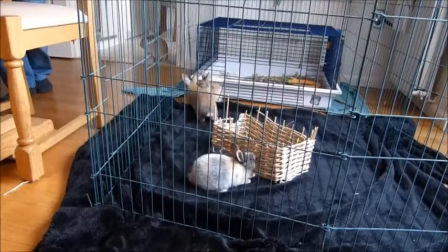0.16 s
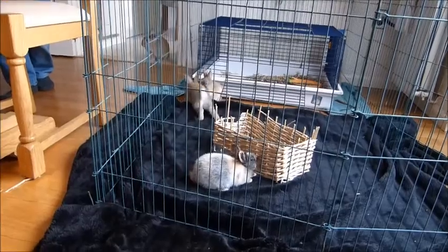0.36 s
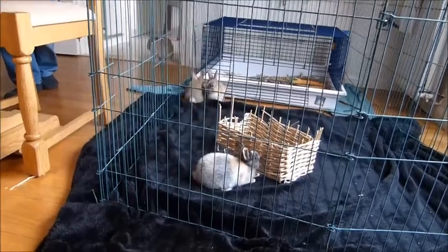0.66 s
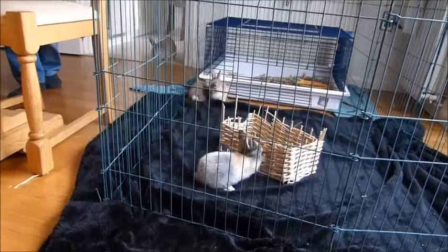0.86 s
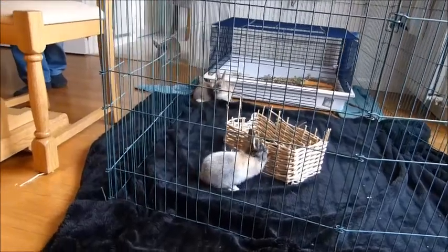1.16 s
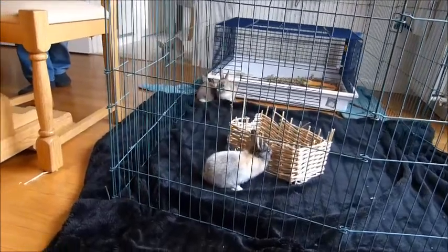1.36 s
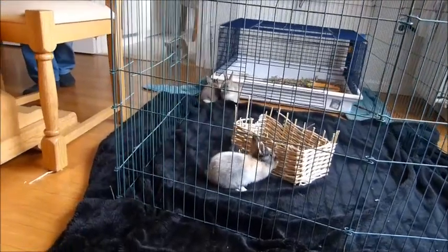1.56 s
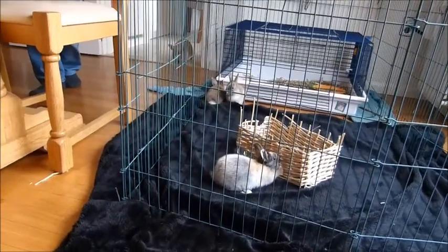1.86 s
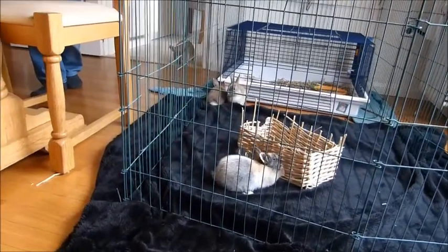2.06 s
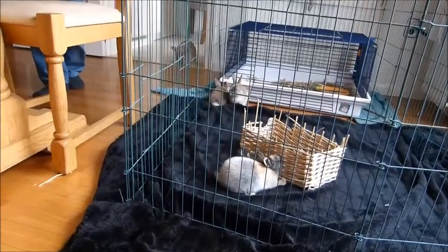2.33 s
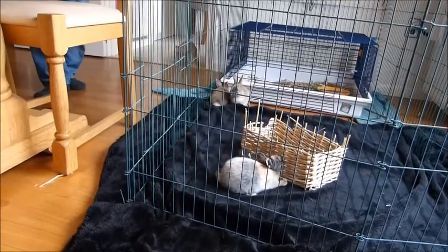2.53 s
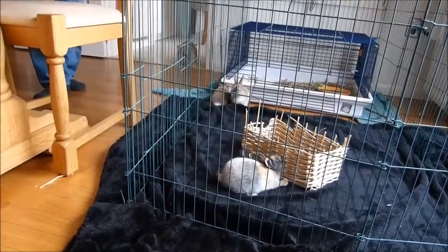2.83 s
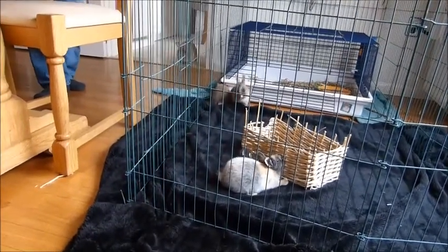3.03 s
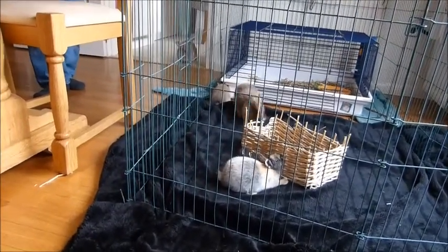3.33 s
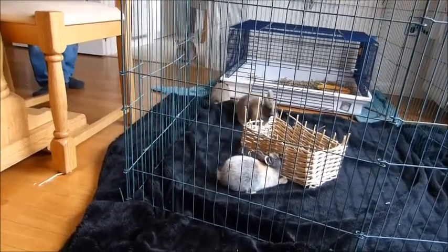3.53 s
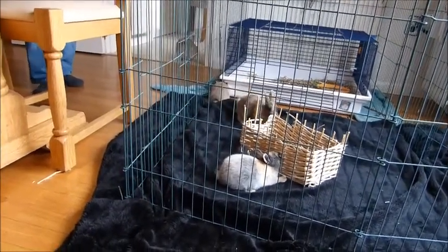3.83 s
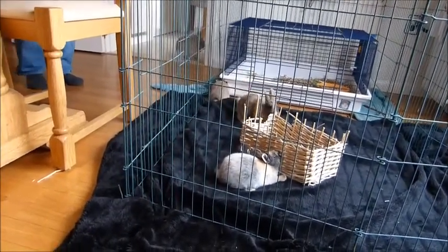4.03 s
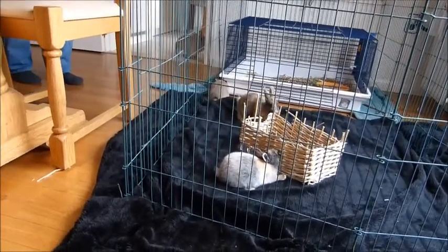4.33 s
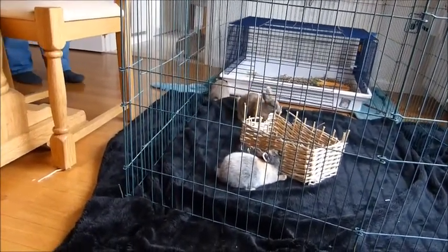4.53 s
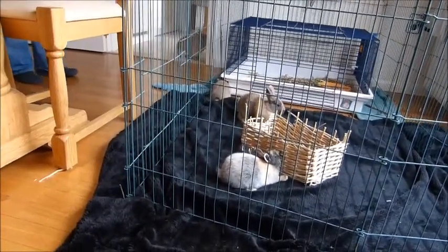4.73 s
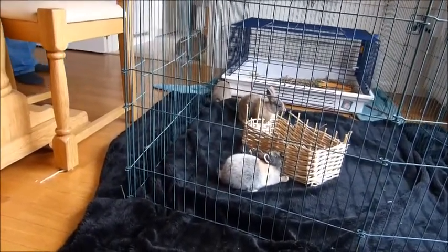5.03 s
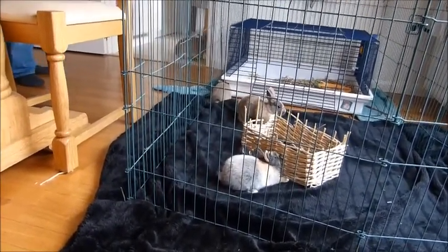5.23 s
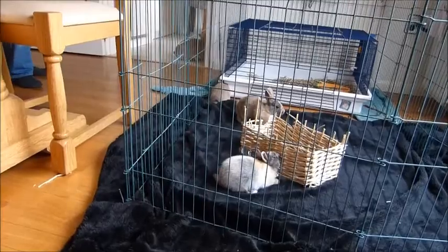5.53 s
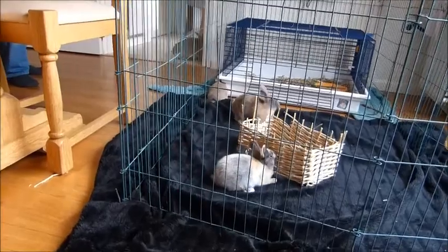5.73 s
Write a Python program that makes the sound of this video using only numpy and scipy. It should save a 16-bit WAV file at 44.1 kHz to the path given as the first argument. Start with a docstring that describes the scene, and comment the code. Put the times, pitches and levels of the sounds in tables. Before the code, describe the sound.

Young rabbits nibble at a wicker basket in a slightly echoing room. Light clicks and short crackling rustles come in small clusters, then thin out. A soft, low thud lands about halfway through. Sharper snaps of dry cane follow, mixed with hollow wooden knocks and a brief clatter from further off. The basket sounds fairly near the microphone, over a faint hum and hiss.

```python
"""Rabbits at a wicker basket

Young rabbits nibble and tug at a basket in a live room with a wooden floor. Dry canes snap by
brittle fracture and rub by stick-slip friction in short crackling rustles. Something lands with a
soft thud, and hollow wooden knocks and a clatter come from further off, over a faint hum and hiss."""
import sys
import numpy as np
from scipy import signal
from scipy.fft import rfft, irfft
from scipy.io import wavfile
from scipy.ndimage import uniform_filter1d

SR = 44100
rng = np.random.default_rng(int(sys.argv[2]) if len(sys.argv) > 2 else 0)


def file_out(sig):
    """Save sig as 16-bit WAV at sys.argv[1]."""
    # one column per channel
    cols = np.atleast_2d(sig).T
    # limit, then scale
    lim = np.clip(cols, -1, 1)
    pcm = np.round(lim * 32767).astype(np.int16)
    wavfile.write(sys.argv[1], SR, pcm)


N = 259308
HZ = np.fft.rfftfreq(4096, 1 / SR)  # frequency grid of the filter curves


# Each row: start in seconds, snap level in dB, resonance of the cane in Hz, drop to the second
# crack in dB, rub level in dB. Event levels in all tables are relative.
BITES = [(0.3977, -39.5, 6940, 12, -64), (0.482, -23, 9000, 8, -60), (0.966, -33, 4500, 12, -66),
         (0.9854, -31, 7650, 14, -58), (1.0317, -29, 8500, -1, -52.5), (1.127, -29.5, 7350, 10, -53.5),
         (1.1808, -27.5, 7000, 4, -53.5), (1.339, -25.5, 6130, 7, -53), (1.3772, -23, 4560, 10, -55),
         (1.4688, -22.5, 7560, -2, -66), (1.5201, -21.5, 7540, 9, -48), (1.6553, -26.5, 5830, 3.5, -59),
         (1.7054, -30.5, 3550, 10, -56), (1.7532, -28, 3780, 16, -60.5), (2.0788, -39, 7350, 14, -60),
         (2.2515, -40, 5500, 8, -55), (2.287, -28.5, 9100, 12, -52.5), (2.7645, -35, 5130, 11, -54),
         (3.3772, -34, 5250, 18, -76), (3.479, -37, 7700, 14, -77), (3.8642, -30, 5330, 12, -52),
         (3.8913, -15.5, 6340, 27, -58), (4.0308, -19.5, 3630, 9, -48.5), (4.146, -28, 6150, 18, -67),
         (4.2093, -31, 4180, 15, -56.5), (4.4999, -19, 5940, 16, -44), (4.5776, -20.5, 7650, 11, -35.5),
         (4.6864, -27.5, 4140, 14, -50), (4.9324, -23.5, 7300, 20, -68), (4.9721, -12.5, 8200, 15, -49),
         (5.0145, -21, 7700, 12, -46.5), (5.2414, -18.5, 3000, 0, -35), (5.467, -35, 5400, -2, -48.5),
         (5.7472, -27.5, 6540, 17, -53.5)]
# A snapping cane. Each row: frequency in Hz, spectral level in dB.
SNAP_SPECTRUM = [(150, -20.5), (400, -18), (800, -15.5), (1200, -14), (2200, -7), (3200, -7), (4100, 0.5),
                 (5200, 2), (8000, -0.5), (10000, -1), (12500, -12.5), (15500, -34)]
def snaps(level_db=-8, snap_ms=1.72, second_crack_s=0.0093, width_octaves=0.25, hard_bite_db=-19):
    """Brittle fracture: a cane gives way in two bursts, each coloured by its broad resonance."""
    out = np.zeros(N)
    for start, first_db, hz, drop_db, _ in BITES:
        resonance = 1 / (1 + (np.log2((HZ + 1) / hz) / width_octaves) ** 2)
        for delay, db, peak_db in [(0, first_db, 7), (second_crack_s, first_db - drop_db, 2)]:
            stretch = 1 + np.clip(0.09 * (hard_bite_db - db), 0, 1)  # gentle bites crush more slowly
            crunch = burst(snap_ms * stretch, rise=0.32) / stretch ** 0.44
            curve_db = curve_at(SNAP_SPECTRUM, HZ) + peak_db * resonance
            add(out, start + delay, amp(db + level_db) * colour(crunch, curve_db))
    return out


def pings(level_db=-19, db_per_octave=-3.5, middle_hz=5000, middle_t60_s=0.021):
    """Damped free vibration: a snapped cane rings on; thicker, lower canes ring louder and longer."""
    out, t = np.zeros(N), np.arange(SR // 4) / SR
    for start, db, hz, *_ in BITES:
        pitch_ratio = hz / middle_hz
        onset_db = db + level_db + db_per_octave * np.log2(pitch_ratio)
        decay_db = 60 * t * pitch_ratio / middle_t60_s
        add(out, start, amp(onset_db - decay_db) * np.sin(2 * np.pi * hz * t))
    return out


# Rubbing cane. Each row: frequency in Hz, spectral level in dB.
RUB_SPECTRUM = [(150, -36), (400, -22.5), (800, -11.5), (1300, -13), (2200, -9.5), (3300, -8), (4100, -1.5),
                (6000, 0), (8500, 1), (10500, -8.5), (13000, -15.5), (15500, -32)]
# Fur and paws on the weave. Each row: start and length in seconds, level in dB, low-band gain in dB.
BRUSHES = [(0.365, 0.061, -65.5, -7), (2.232, 0.088, -53, 0), (2.518, .11, -54, 7), (2.971, .1, -55, -26),
           (3.229, .143, -62.5, -4), (3.839, 0.058, -53.5, 4), (4.624, 0.3, -56.5, -2)]
# Steady gnawing at the rim. Each row: time in seconds, level in dB.
GNAWING = [(0.955, -69), (1.11, -54.5), (1.17, -51.5), (1.29, -45.5), (1.32, -69), (1.38, -48.5),
           (1.54, -53), (1.62, -68), (1.69, -54), (1.79, -63)]
# The duller rustle of shuffling about. Each row: time in seconds, level in dB.
SHUFFLING = [(2.5, -63.5), (2.88, -62.5), (2.99, -53), (3.08, -68), (3.65, -66), (4.2, -57.5), (4.45, -59),
             (4.55, -45.5), (4.64, -68.5), (5.22, -57.5), (5.5, -67), (5.88, -63.5)]
def rustles(level_db=-2.5, cracks_per_s=1100, clump_db=3, low_band_hz=3000, lead_s=0.005, rub_s=0.041):
    """Stick-slip friction: canes catch and slide on each other in clumps of micro-cracks."""
    out, t = np.zeros(N), np.arange(N) / SR
    clumps = unit_rms(uniform_filter1d(rng.standard_normal(N), size=200))
    slips = rng.random(N) < cracks_per_s / SR
    cracks = slips * rng.choice([-1, 1], N) * amp(clump_db * clumps)
    rub_db = curve_at(RUB_SPECTRUM, HZ)
    low_band = 1 / (1 + (HZ / low_band_hz) ** 4)
    # A bitten cane slides in the weave from just before it snaps.
    bite_rubs = [(start - lead_s, rub_s, db, -2) for start, *_, db in BITES]
    for start, length, db, low_db in bite_rubs + BRUSHES:
        window = signal.windows.tukey(round(length * SR), 0.6)
        stroke = unit_rms(np.roll(cracks, rng.integers(N))[:len(window)] * window)
        add(out, start, amp(db + level_db) * colour(stroke, rub_db + low_db * low_band))
    for contour, low_db in [(GNAWING, -4.5), (SHUFFLING, 13)]:
        effort = amp(level_db + np.interp(t, *np.transpose(contour), left=-np.inf, right=-np.inf))
        add(out, 0, colour(unit_rms(cracks) * effort, rub_db + low_db * low_band))
    return out


# Modes of the basket. Each row: frequency in Hz, level in dB, time to decay by 60 dB in seconds.
BASKET_MODES = [(776, -2.5, 0.046), (632, -12, 0.02), (1060, -12, 0.011)]
# Harder pulls and nudges. Each row: start in seconds, level in dB.
NUDGES = [(0.4823, -50), (0.86, -52.5), (3.8914, -48.5), (4.9722, -43), (5.0144, -50), (5.722, -48.5)]
def tugs(bite_coupling_db=-33):
    """Modal response: a pull on one cane shakes the whole basket into a short hollow note."""
    out, t = np.zeros(N), np.arange(SR // 4) / SR
    note = sum(amp(db - 60 * t / t60) * np.sin(2 * np.pi * hz * t) for hz, db, t60 in BASKET_MODES)
    for start, db, *_ in BITES:
        add(out, start, amp(db + bite_coupling_db) * note)
    for start, db in NUDGES:
        add(out, start, amp(db) * note)
    return out


# Wooden knocks. Each row: start in seconds, level in dB, treble tilt in dB per octave.
KNOCKS = [(4.029, -34, -2), (4.396, -39, -3.5), (4.458, -37.5, -2.5), (4.499, -42.5, 0), (4.528, -37, 4),
          (4.571, -26.5, 2), (4.582, -27, -0.5), (5.242, -38, 8.5), (5.357, -53.5, -12)]
# Struck hollow wood. Each row: frequency in Hz, spectral level in dB.
WOOD_SPECTRUM = [(50, -62), (110, -36), (180, -6.5), (300, -8.5), (400, -3), (620, 1.5), (900, 1.5),
                 (1400, -1), (1850, -6), (3000, -10), (5000, -11), (8500, -16.5), (11000, -48),
                 (14000, -45)]
def knocks(contact_ms=6, pivot_hz=1000):
    """Impact excitation: hollow wood is struck with a short rattling contact and bounces once."""
    out = np.zeros(N)
    octaves = np.log2(np.clip(HZ / pivot_hz, 1, 4))
    for start, db, tilt in KNOCKS:
        for delay, bounce_db, bounce_tilt in rebounds(gap_s=0.013, loss_db=5, dulling=3, count=2):
            curve_db = curve_at(WOOD_SPECTRUM, HZ) + (tilt + bounce_tilt) * octaves
            add(out, start + delay, amp(db + bounce_db) * colour(burst(contact_ms), curve_db))
    return out


# Modes of the wood. Each row: frequency in Hz, relative level in dB.
WOOD_MODES = [(172, -63), (259, -56), (366, -54), (464, -55), (615, -50), (818, -49.5), (887, -58),
              (980, -55), (1034, -51.5), (1102, -51), (1168, -51.5), (1302, -58), (1354, -60), (1394, -67),
              (1441, -56), (1532, -64), (2551, -65), (3008, -60), (3194, -62)]
def wood_ring(level_db=-8, t60_s=0.5, rise_s=0.016):
    """Modal decay: the wood rings on after each knock; sharp, bright knocks excite it less."""
    out, t = np.zeros(N), np.arange(SR // 2) / SR
    for start, db, tilt in KNOCKS:
        ring = sum(amp(mode_db) * np.sin(2 * np.pi * (hz * t + rng.random()))
                   for hz, mode_db in WOOD_MODES)
        envelope = amp(db + level_db - max(tilt, 0) - 60 * t / t60_s) * np.minimum(t / rise_s, 1)
        add(out, start, envelope * unit_rms(ring))
    return out


# Soft thuds. Each row: start in seconds, level in dB, contact time in ms, tilt in dB per octave.
THUDS = [(0.483, -56.5, 3.3, -3), (0.75, -59.5, 28, 8), (2.581, -56, 13.5, 10.5), (2.975, -49.5, 13, 9),
         (3.007, -32.5, 8.4, 1.5), (4.535, -46, 16, 0), (5.722, -56.5, 3, 6)]
# A padded blow. Each row: frequency in Hz, spectral level in dB.
THUD_SPECTRUM = [(40, -57.5), (95, -31), (135, -10.5), (165, -0.5), (205, -9), (255, 3.5), (320, -0.5),
                 (385, 2), (460, -8.5), (680, -9), (1100, -22), (1800, -32.5), (3500, -85)]
def thuds(level_db=-1, pivot_hz=150):
    """Cushioned impact: padded blows on the floor sound low and settle in two rebounds."""
    out = np.zeros(N)
    octaves = np.log2(np.maximum(HZ / pivot_hz, 1))
    for start, db, ms, tilt in THUDS:
        for delay, bounce_db, bounce_tilt in rebounds(gap_s=0.036, loss_db=5.5, dulling=8.5, count=3):
            curve_db = curve_at(THUD_SPECTRUM, HZ) + (tilt + bounce_tilt) * octaves
            add(out, start + delay, amp(db + bounce_db + level_db) * colour(burst(ms), curve_db))
    return out


def rebounds(gap_s, loss_db, dulling, count):
    """Inelastic bouncing: delay in seconds, gain in dB and tilt in dB per octave of each contact."""
    return [(k * gap_s, -k * loss_db, -dulling * (k > 0)) for k in range(count)]


def burst(ms, rise=0.58):
    """Broadband excitation: a flurry of tiny impacts builds up and dies with a time constant of ms."""
    samples = np.clip(ms, 1.5, 60) * SR / 1000
    age = np.arange(round(6 * samples)) / samples
    envelope = np.exp(-age) * (1 - np.exp(-(age / rise) ** 2))
    flurry = envelope * rng.standard_normal(len(age))
    for _ in range(3):  # flatten the spectrum, then taper again
        spectrum = rfft(flurry)
        flurry = irfft(spectrum / (abs(spectrum) + 1e-12), len(age)) * envelope ** 0.15
    return flurry * np.sqrt(samples / 2) / np.linalg.norm(flurry)


# First echoes. Each row: delay in ms, relative level in dB.
ECHOES = [(3.3, -26.5), (8.8, -8), (9.9, -11), (13.3, -16.5), (14.8, -17)]
def with_reflections(x, level_db=-2):
    """Early reflection: the floor and walls add delayed, weaker copies to the direct sound."""
    out = x.copy()
    for ms, db in ECHOES:
        add(out, ms / 1000, amp(db + level_db) * x)
    return out


# Decay of the room. Each row: frequency in Hz, reverberation time in seconds.
ROOM_T60 = [(150, 0.75), (500, 0.48), (1400, 0.5), (4000, 0.47), (9000, 0.37), (15000, 0.19)]
def room_tail(early_boost=0.48, early_s=0.017, build_s=0.003):
    """Absorption: the mid and side of a diffuse tail die away at a different rate in each band."""
    hz, t, bands = signal.stft(rng.standard_normal((2, SR * 2 // 3)), SR, nperseg=256)
    decay = amp(-60 * t / curve_at(ROOM_T60, hz)[:, None])
    tail = signal.istft(bands * decay, SR, nperseg=256)[1]
    t = np.arange(tail.shape[1]) / SR
    build_up = 1 - np.exp(-(t / build_s) ** 2)
    tail = tail * build_up * (1 + early_boost * np.exp(-t / early_s))
    return tail / np.linalg.norm(tail[0])


def room(x, wet_db, side_db, tails=6, crossfade_s=0.011):
    """Diffuse reverberation: crossfading through independent stereo tails avoids metallic ringing."""
    turn = np.arange(N) / SR / crossfade_s
    mid, side = np.zeros(N), np.zeros(N)
    for k in range(tails):
        offset = abs((turn - k) % tails - tails / 2)
        share = np.cos(np.pi / 2 * np.minimum(offset, 1))  # equal-power crossfade
        tail = amp(wet_db) * signal.oaconvolve((x * share)[None], room_tail(), axes=1)[:, :N]
        mid += tail[0]
        side += amp(side_db) * tail[1]
    return np.array([mid + side, mid - side])


# Background of the room. Each row: frequency in Hz, spectral level in dB.
AIR_SPECTRUM = [(15, -39), (25, -12), (59, -10.5), (267, -1.5), (445, -4), (509, 0), (684, -4), (762, 0.5),
                (919, -7), (997, -7.5), (1080, -7), (1490, -9.5), (2120, -14.5), (10600, -22), (15500, -32)]
# Its stereo image. Each row: frequency in Hz, correlation of left and right.
AIR_CORRELATION = [(60, 0.62), (130, 0.39), (290, -0.64), (640, -0.68), (1410, -0.49), (3100, -0.3),
                   (6820, 0.61), (15000, 0.31)]
def air(level_db=-59.6):
    """Stationary noise: the quiet hum and hiss of the room, partly correlated between the channels."""
    hz = np.fft.rfftfreq(N, 1 / SR)
    left, independent = rfft(rng.standard_normal((2, N)))
    correlation = curve_at(AIR_CORRELATION, hz)
    right = correlation * left + np.sqrt(1 - correlation ** 2) * independent
    spectra = np.array([left, right]) * amp(curve_at(AIR_SPECTRUM, hz))
    return amp(level_db) * unit_rms(irfft(spectra, N))


def colour(x, curve_db):
    """Minimum-phase filtering: a response of unit energy whose gain over HZ follows the curve."""
    log_gain = np.log(amp(np.maximum(curve_db - curve_db.max(), -100)))
    mirrored = np.concatenate([log_gain, log_gain[-2:0:-1]])
    response = np.exp(np.conj(signal.hilbert(mirrored)))
    taps = np.fft.ifft(response).real
    return signal.fftconvolve(x, taps / np.linalg.norm(taps))


def amp(db):
    """Amplitude ratio of a level in decibels."""
    return 10 ** (np.asarray(db) / 20)


def unit_rms(x):
    """Normalisation to an rms of one."""
    return x / np.sqrt(np.mean(x ** 2) + 1e-20)


def curve_at(points, hz):
    """Interpolation of (Hz, value) rows on a log-frequency axis."""
    knots_hz, values = np.transpose(points)
    return np.interp(np.log(hz + 1), np.log(knots_hz + 1), values)


def add(mix, start, sound):
    """Superposition: a sound joins the mix at its start in seconds."""
    part = mix[max(round(start * SR), 0):][:len(sound)]
    part += sound[:len(part)]


def scene():
    """Direct and reverberant fields: the basket is near; the knocks come mostly through the room."""
    wicker = snaps() + rustles() + pings() + tugs()
    blows, pads = knocks(), thuds()
    basket = with_reflections(wicker) + room(wicker, wet_db=-0.5, side_db=-6)
    wood = blows + wood_ring() + room(blows, wet_db=3, side_db=-5.5)
    floor = pads + room(pads, wet_db=-0.5, side_db=-8.5)
    # Basket and wood lie slightly to the right.
    return basket * amp([[-0.3], [0.3]]) + wood * amp([[-0.5], [0.5]]) + floor + air()


def record(dry, cutoff_hz=15900):
    """Band limiting: a steep low-pass filter removes the highest treble."""
    taps = signal.firwin(511, cutoff_hz, window=("kaiser", 9), fs=SR)
    return signal.oaconvolve(dry, taps[None], "same")


dry = scene()
out = record(dry)
file_out(out)
```